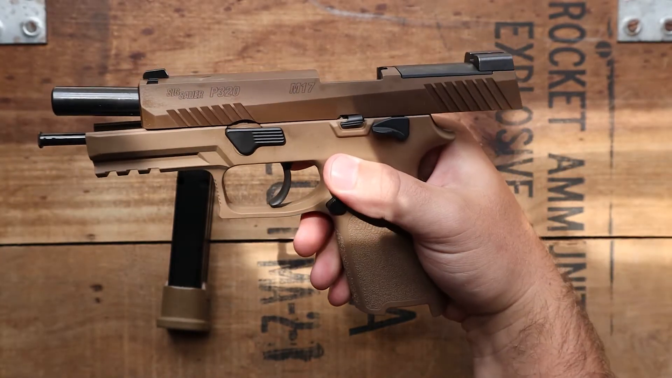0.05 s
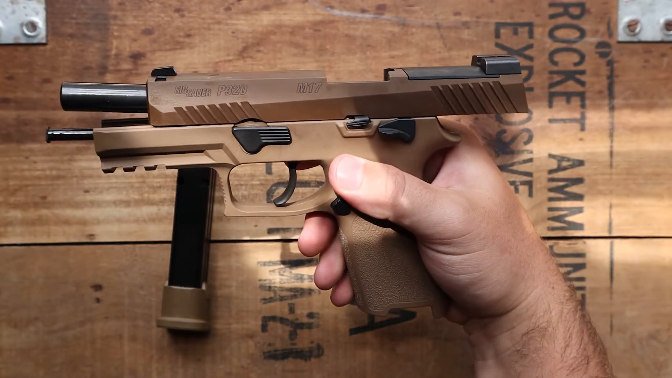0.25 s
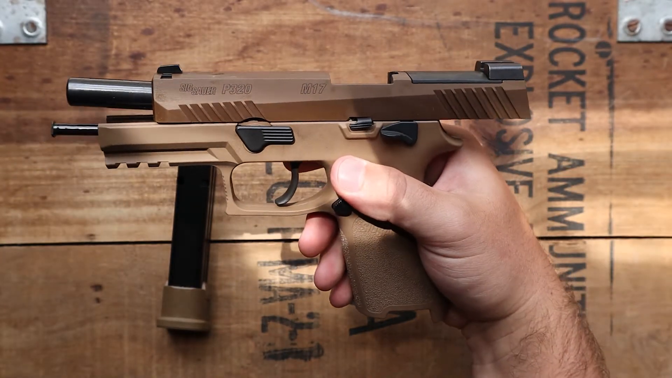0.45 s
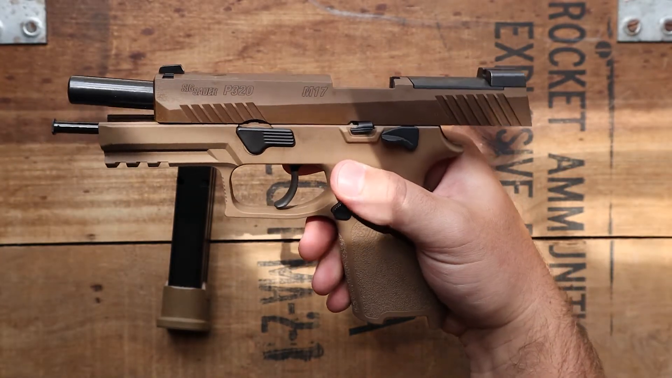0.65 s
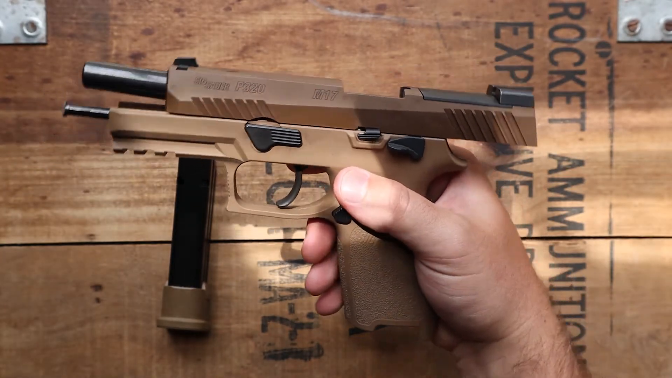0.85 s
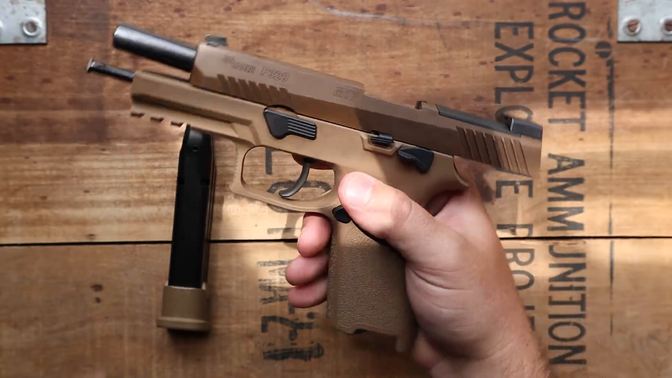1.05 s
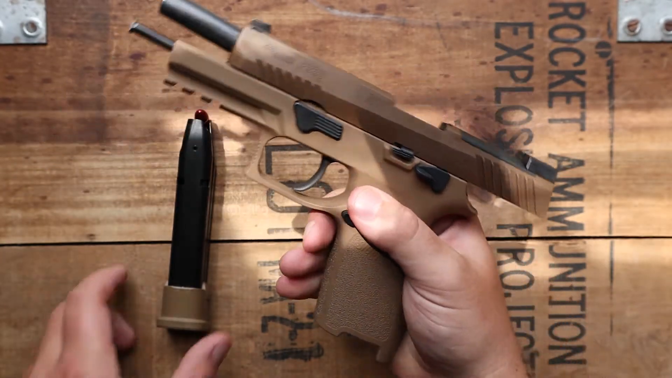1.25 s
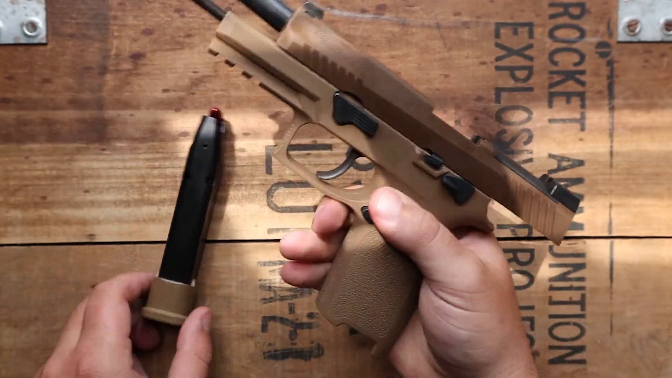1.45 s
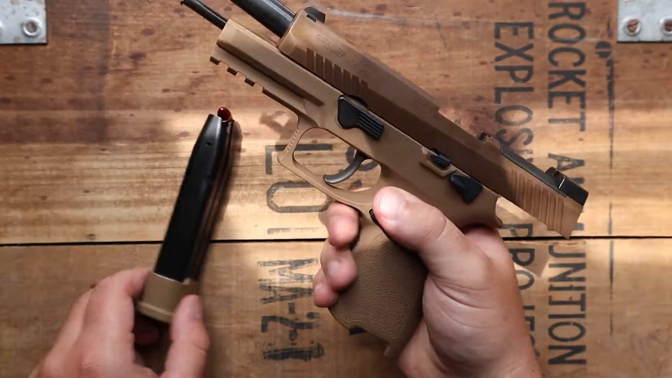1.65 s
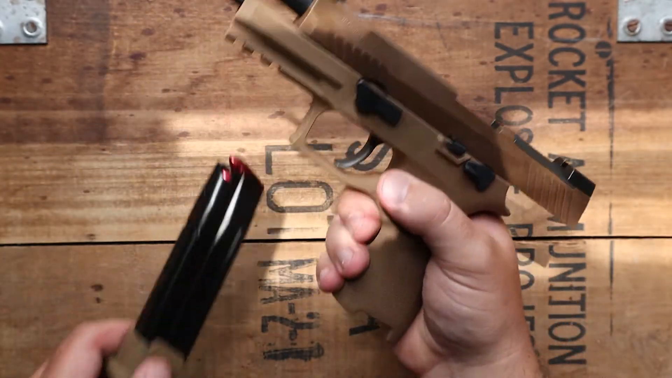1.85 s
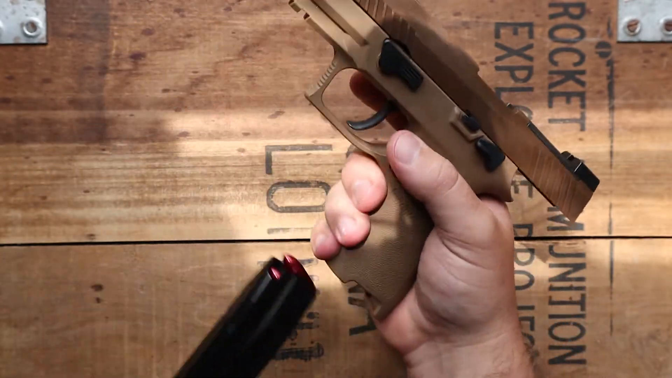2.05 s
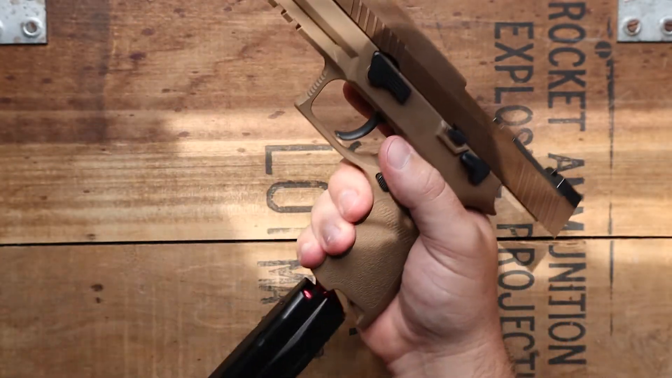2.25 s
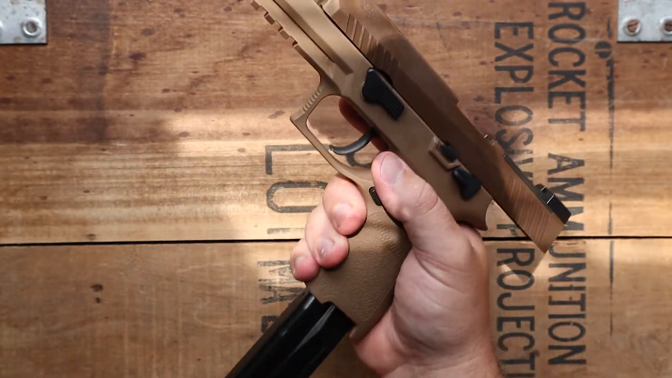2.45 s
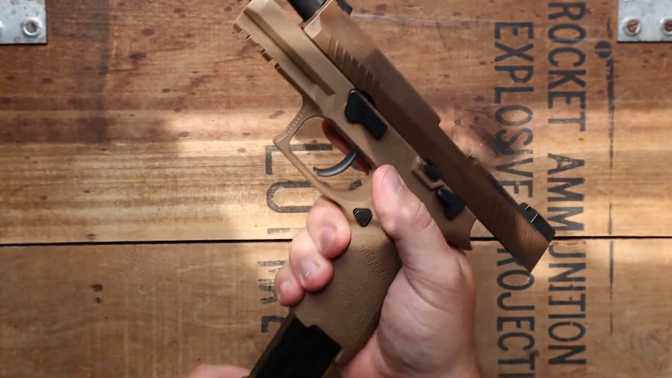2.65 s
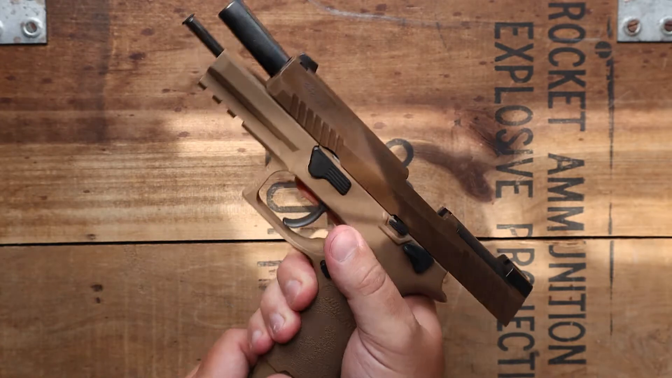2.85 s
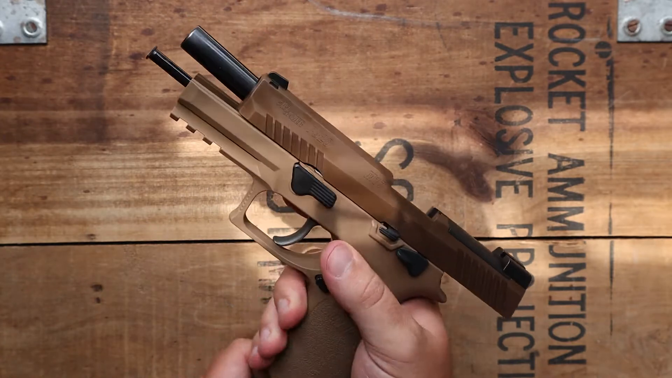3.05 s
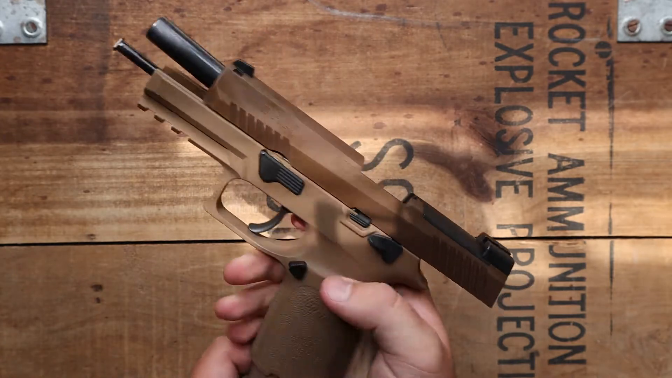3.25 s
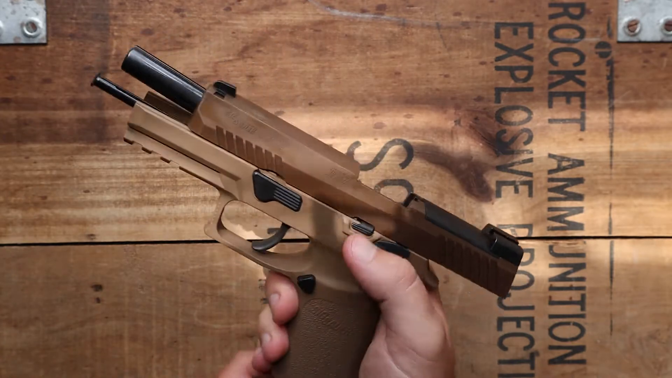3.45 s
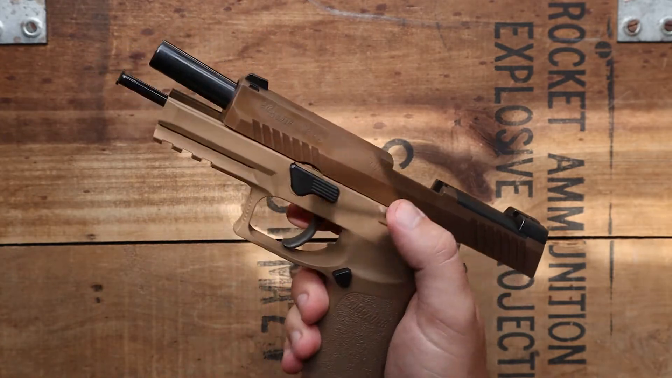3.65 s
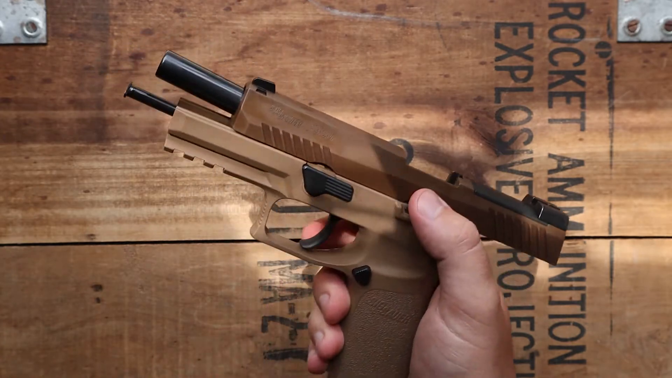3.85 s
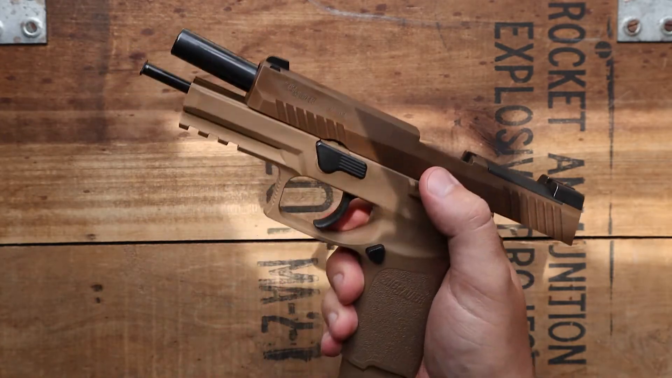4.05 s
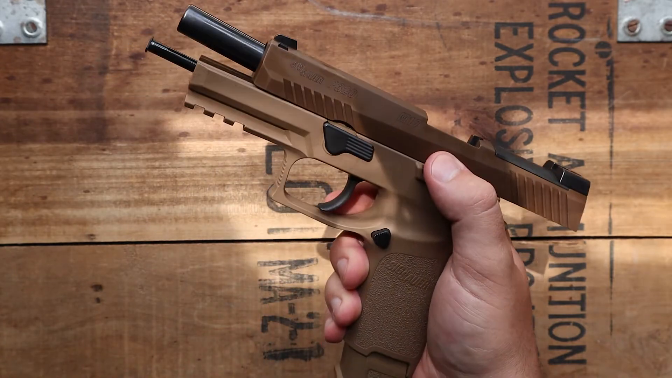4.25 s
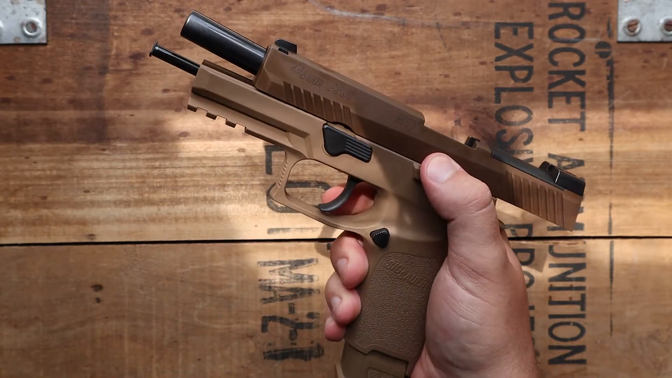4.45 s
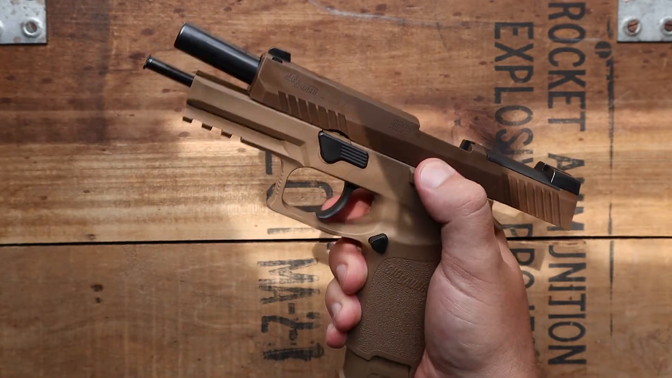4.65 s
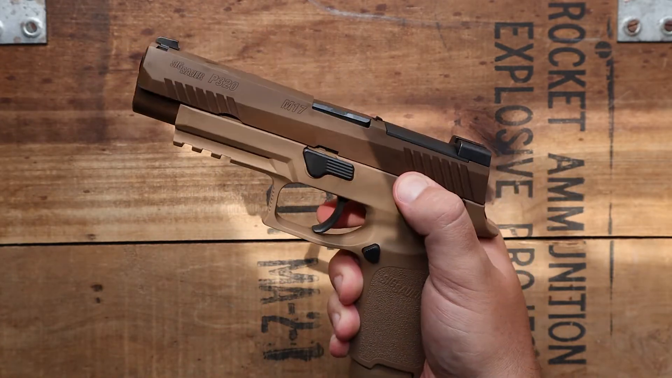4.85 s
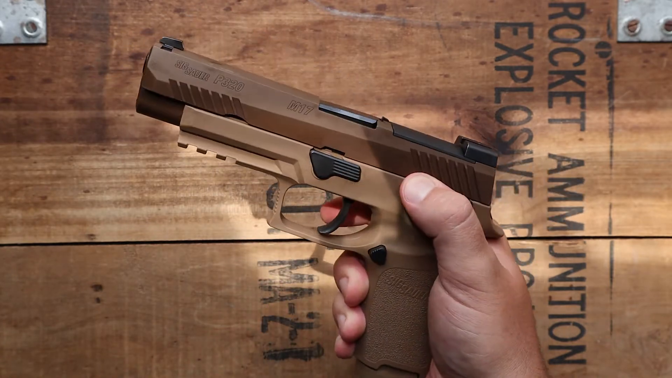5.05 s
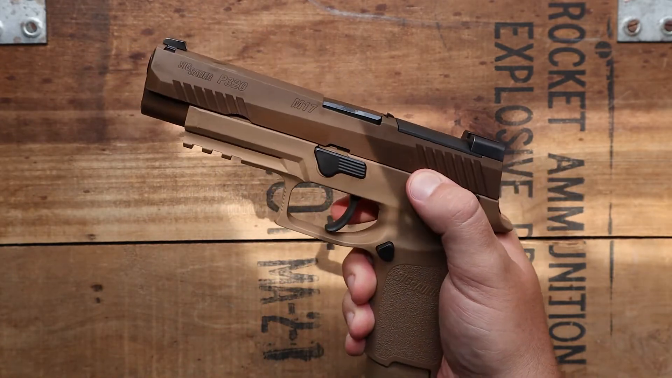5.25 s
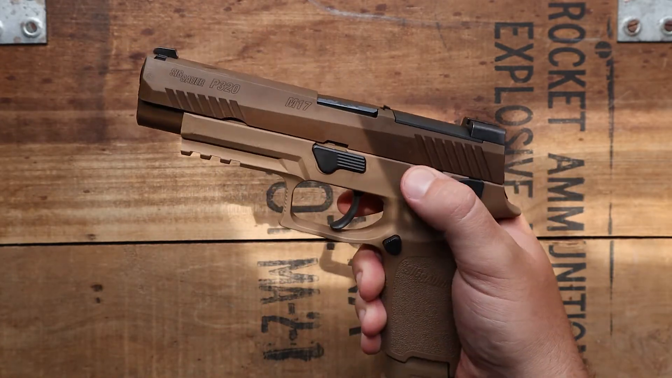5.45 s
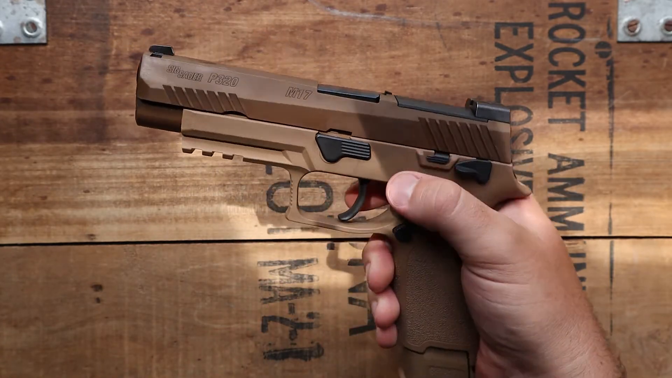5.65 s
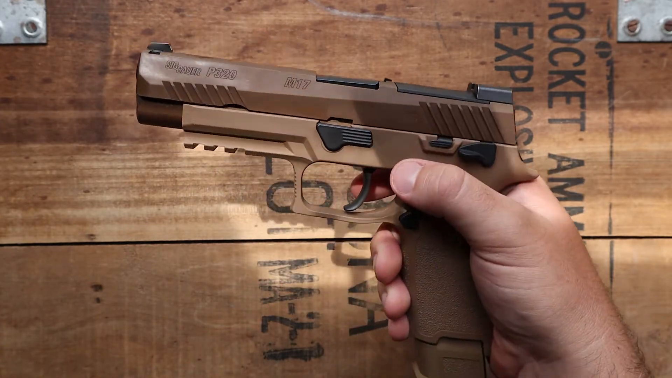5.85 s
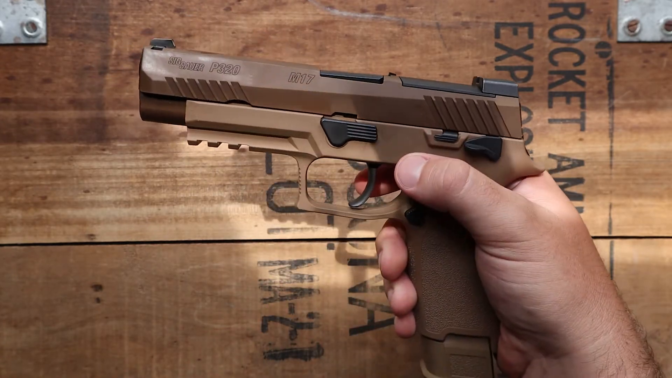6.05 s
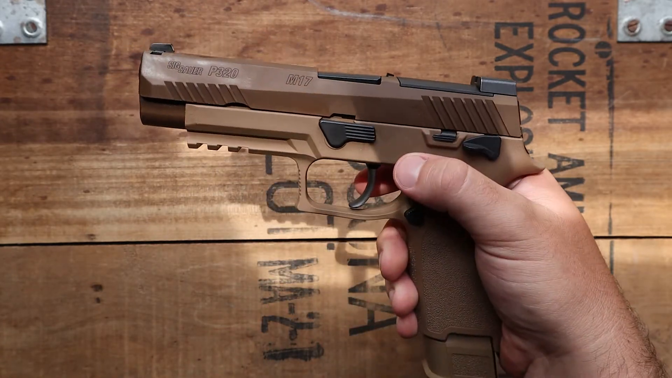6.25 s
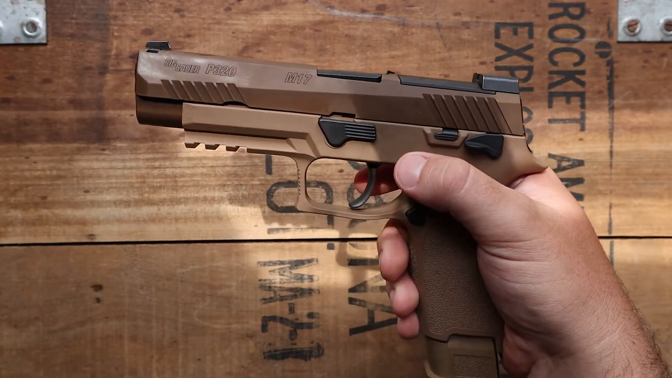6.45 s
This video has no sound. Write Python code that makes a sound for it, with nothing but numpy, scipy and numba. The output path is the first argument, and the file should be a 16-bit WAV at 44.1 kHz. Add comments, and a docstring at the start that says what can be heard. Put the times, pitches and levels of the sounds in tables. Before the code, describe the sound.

Over low steady air noise and a barely audible fan, faint wooden knocks and a short scrape come first. Clicks and a gritty slide quicken into a sharp double metallic smack as a magazine seats, with its rounds shaking briefly. A few tiny ticks, near quiet, a soft click, then a fast bright metal clatter and heavy slam. It is close and dry, with a short bright room tail and fading ring.

```python
"""A pistol is loaded close to the microphone, over a wooden crate in a small room with air noise and a fan.
Skin brushes the grip; a magazine tips and drags on the boards, which answer as damped modes. It clicks and
scrapes up the grip, slips past the catch and is slapped home, and its rounds shake. Loose parts tick, the
thumb loads the catch, and the slide runs forward on its spring and slams shut, leaving a thin steel ring.
Blows are bursts of modes, rubbing is grainy noise, and a limiter squeezes the loudest blows."""
import sys
import numpy as np
from scipy import signal
from scipy.fft import rfft, irfft
from scipy.io import wavfile
from scipy.ndimage import uniform_filter1d, minimum_filter1d
from numba import njit

SR = 44100
rng = np.random.default_rng(int(sys.argv[2]) if len(sys.argv) > 2 else 0)


def store_pcm(level_fs):
    """Save levels as 16-bit WAV."""
    pcm = np.round(np.clip(level_fs, -1, 1) * 32767).astype(np.int16)
    wavfile.write(sys.argv[1], SR, np.atleast_2d(pcm).T)


N = 286723
T = np.arange(N) / SR  # s
AGE = T[:SR // 8]  # time since a blow, s
SPRING_HZ = 4600  # note of the springs among the ringing parts

# The magazine dragged over the boards. Each row: middle in seconds, length in seconds,
# scrape level in dB, judder level at mid-stroke in dB.
DRAGS = [(1.488, .056, -54.5, -64), (1.756, .054, -57.5, -45.5)]
# Colour of the magazine's sliding contact with the grip. Each row: frequency in Hz, level in dB.
FEED_SPECTRUM = [(120, -53), (400, -17.5), (950, 3.5), (1600, -6.5), (3000, 3), (5500, -6), (8000, -7),
                 (10500, -14), (16000, -18.5)]


def undb(db):
    """Decibels are logarithmic: 20 dB is a factor of ten in amplitude."""
    return 10 ** (np.asarray(db) / 20)


def fade(t, t60):
    """Exponential decay: viscous loss takes 60 dB in t60 seconds."""
    return np.exp(-np.log(1000) * t / np.maximum(t60, 1e-4))


def unit(x):
    """Normalization to unit mean power."""
    return x / np.sqrt(np.mean(x ** 2))


def crest(x, size=128):
    """Short-time power: the loudest three milliseconds are scaled to rms 1."""
    return x / np.sqrt(uniform_filter1d(x ** 2, size).max())


def add(out, s, x):
    """Superposition: x is mixed into out from s seconds."""
    i = int(s * SR)
    out[i:i + len(x)] += x[:N - i]


def colour(x, points, size=2048):
    """Minimum-phase filtering through points in (Hz, dB): folding the cepstrum makes the response causal."""
    hz, db = np.transpose(points)
    f = np.maximum(np.fft.rfftfreq(size, 1 / SR), 1)
    gain_db = np.interp(np.log(f), np.log(hz), db)
    cepstrum = irfft(np.log(undb(gain_db)))
    cepstrum[1:size // 2] *= 2
    cepstrum[size // 2 + 1:] = 0
    response = irfft(np.exp(rfft(cepstrum)))
    return signal.fftconvolve(x, response)[:len(x)]


def mode(t, hz, t60):
    """Free vibration: a damped mode is a sine under an exponential decay."""
    return np.sin(2 * np.pi * hz * t) * fade(t, t60)


def stroke(t, middle, length):
    """A movement swells and dies away as a Gaussian, 6 dB down at the ends of its length."""
    return .5 ** ((2 * (t - middle) / length) ** 2)


def rub(level, spectrum, grain_db, patchy_db, size=24):
    """Sliding friction: surface bumps catch and slip in tiny grains, which crowd into uneven patches."""
    grains = np.repeat(grain_db * rng.standard_normal(N // size + 1), size)[:N]
    patch_points = patchy_db * rng.standard_normal(N // size)
    patches = np.interp(np.arange(N) / (10 * size), np.arange(N // size), patch_points)
    noise = undb(grains + patches) * rng.standard_normal(N)
    return level * unit(colour(noise, spectrum))


def background(air_db=-62.5, width_hz=3):
    """Stationary noise: broadband air, and a distant fan's tones that waver as narrow bands of noise do."""
    # Air noise. Each row: frequency in Hz, relative level in dB.
    air_spectrum = [(24, -85.5), (40, -59.5), (167, -35), (392, -12.5), (479, -10), (516, -8), (630, -7),
                    (680, -2.5), (733, -5.5), (810, -4), (1150, -7.5), (2050, -9), (3650, -18),
                    (14800, -26.5), (16000, -18.5)]
    # Tones of the fan. Each row: frequency in Hz, rms level in dB.
    fan_tones = [(522.2, -83.5), (629.8, -83.5), (683.7, -75), (1007, -82.5), (1227, -81), (1443, -80.5)]
    air = undb(air_db) * unit(colour(rng.standard_normal(N), air_spectrum))
    f = np.fft.rfftfreq(N, 1 / SR)
    bands = np.zeros(len(f))
    for hz, db in fan_tones:
        peak = undb(db) * np.sqrt(SR / np.pi / width_hz)  # gives each band its rms level
        bands += peak / (1 + ((f - hz) / width_hz) ** 2)
    fan = irfft(rfft(rng.standard_normal(N)) * bands, N)
    return air + fan


def room(x, level_db=-14, build_s=0.0096, gap_s=0.0021):
    """Reverberation: reflections thicken after a short gap and die away at a rate set by frequency."""
    # Reflections of the room. Each row: frequency in Hz, relative level in dB, t60 in seconds.
    reflections = [(150, -19, .2), (400, -15, 0.095), (800, -5.5, 0.31), (1722, -6, 0.37),
                   (3500, -1.5, 0.36), (7500, 0.5, 0.35), (10500, 1.5, 0.28), (16000, -0.5, 0.27)]
    hz, db, t60 = np.transpose(reflections)
    f, t, cells = signal.stft(rng.standard_normal(SR), SR, nperseg=256)
    decay = fade(t, np.interp(f, hz, t60)[:, None])
    tail = signal.istft(cells * decay)[1][:SR]
    tail = tail * (1 - np.exp(-np.maximum(T[:SR] - gap_s, 0) / build_s))
    tail = colour(tail / np.sqrt(np.sum(tail ** 2)), np.column_stack([hz, db]))
    return undb(level_db) * signal.fftconvolve(x, tail)[:N]


def hand():
    """Light friction: skin brushes the grip in short strokes."""
    # The hand shifting on the grip. Each row: middle in seconds, length in seconds, level in dB.
    brushes = [(0.163, 0.033, -62.5), (0.784, 0.12, -67.5), (1.41, 0.17, -73), (3.273, 0.066, -65),
               (4.09, .055, -65.5), (6.33, 0.076, -69)]
    # Colour of skin on the grip. Each row: frequency in Hz, level in dB.
    skin_spectrum = [(500, -27), (3000, -3.5), (6000, 0), (8500, 1), (10500, -7), (14000, -1),
                     (16000, -5.5)]
    level = sum(undb(db) * stroke(T, s, length) for s, length, db in brushes)
    return rub(level, skin_spectrum, grain_db=1.0, patchy_db=2.0)


def knocks(rows, rattle_db, rattle_t60=0.089):
    """Impact on a modal body: the longer the push, the duller the crate's boards answer."""
    # Modes of the crate. Each row: mean frequency in Hz, level in dB, t60 in seconds.
    crate_modes = [(187, -4.5, 0.19), (256, -1.5, 0.17), (339, 2, 0.052), (454, -1, 0.032), (576, 6, 0.085),
                   (790, -3, 0.087), (1220, -20, .04), (1740, -10, .03)]
    # Colour of the rattle. Each row: frequency in Hz, level in dB.
    rattle_spectrum = [(150, -5), (300, 6), (700, 3.5), (1300, -9), (3300, -17.5), (8000, -27.5),
                       (16000, -37)]
    out = np.zeros(N)
    for s, db, contact_s in rows:
        boards = np.zeros(len(AGE))
        for hz, mode_db, t60 in crate_modes:
            detune = 1 + 0.023 * rng.standard_normal()
            boards += undb(mode_db) * mode(AGE, hz * detune, t60)
        push = signal.fftconvolve(boards, np.exp(-AGE / contact_s))[:len(AGE)]
        rattle = colour(rng.standard_normal(len(AGE)) * fade(AGE, rattle_t60), rattle_spectrum)
        knock = crest(push) + undb(rattle_db) * crest(rattle)
        knock = colour(knock, [(80, -53), (130, -24), (210, 17)])  # cuts the bass
        add(out, s, undb(db) * crest(knock))
    return out


def judder(rate_hz=74, contact_s=0.00077, jitter_s=0.00102):
    """Intermittent contact: the dragged base skips over the wood grain in small, unevenly paced knocks."""
    rows = []
    for middle, length, _, db in DRAGS:
        for s in np.arange(middle - length / 2, middle + length / 2, 1 / rate_hz):
            start = s + jitter_s * rng.standard_normal()
            knock_db = db + 20 * np.log10(stroke(s, middle, length))
            rows.append((start, knock_db, contact_s))
    return rows


def pickup():
    """Impact and friction together: the magazine tips, scrapes and judders on the crate."""
    # The magazine tipping on the boards. Each row: start in seconds, level in dB, contact time in seconds.
    tips = [(1.5184, -46, .0002), (1.5560, -42, 0.00092), (1.563, -43.5, 0.0018)]
    # Colour of the scrape on wood. Each row: frequency in Hz, level in dB.
    scrape_spectrum = [(120, -37), (220, 8), (600, 2), (1200, 2.5), (3300, -5), (6000, -9.5), (9000, -12.5),
                       (16000, -27)]
    level = sum(undb(db) * stroke(T, s, length) for s, length, db, _ in DRAGS)
    tipping = knocks(tips, rattle_db=-12.5)
    skipping = knocks(judder(), rattle_db=0.0)
    return tipping + skipping + rub(level, scrape_spectrum, grain_db=1.5, patchy_db=2.5)


def magazine(seated_s=2.848, rise_s=.008, hold_s=.055, shake_t60=.12, shake_db=-36.5):
    """Friction up the grip, then damped motion: the seated rounds shake on their spring and settle."""
    # Scrape of the magazine as it is pushed up the grip. Each row: time in seconds, level in dB.
    feed_levels = [(2.54, -62.5), (2.664, -48.5), (2.704, -50), (2.84, -47.5)]
    s, db = np.transpose(feed_levels)
    push = undb(np.interp(T, s, db, left=-140, right=-140))
    age = np.maximum(T - seated_s, 0)
    shake = undb(shake_db) * (1 - np.exp(-age / rise_s)) * fade(np.maximum(age - hold_s, 0), shake_t60)
    scrape = rub(push, FEED_SPECTRUM, grain_db=2.5, patchy_db=3.0)
    return scrape + rub(shake, FEED_SPECTRUM, grain_db=3, patchy_db=4.0)


def slide(release_s=4.758, travel_s=0.034, clatter_t60=.085, level_db=-3):
    """Spring-driven motion: friction grows with speed over a quarter swing, then dies away as clatter."""
    # Colour of the running slide. Each row: frequency in Hz, level in dB.
    run_spectrum = [(60, -49.5), (200, -43), (340, -17), (600, -10), (1150, -9.5), (1650, 2), (2200, -2),
                    (4300, -2), (8500, 0), (10000, -5.5), (13000, -1.5), (16000, -10)]
    age = np.maximum(T - release_s, 0)
    speed = np.sin(np.pi / 2 * np.minimum(age / travel_s, 1))
    level = undb(level_db) * speed * fade(np.maximum(age - travel_s, 0), clatter_t60)
    return rub(level, run_spectrum, grain_db=2.14, patchy_db=0.5)


def rings(rise_s=.002):
    """Lightly damped resonance: magazine, barrel and springs sing on after a jolt."""
    # Parts left ringing. Each row: start in seconds, frequency in Hz, level in dB, t60 in seconds.
    ringing_parts = [(4.794, 1766, -45, 2.35), (4.794, 770, -58, 1.7), (2.998, SPRING_HZ, -30, .024),
                     (4.678, SPRING_HZ, -46, .06), (3.110, SPRING_HZ, -57, .14),
                     (3.147, SPRING_HZ, -55.5, .09), (1.478, 3250, -64, .2)]
    out = np.zeros(N)
    for s, hz, db, t60 in ringing_parts:
        add(out, s, undb(db) * mode(T, hz, t60) * (1 - np.exp(-T / rise_s)))
    return out


def crack(envelope, count=2):
    """High modal density: a burst of so many modes that its spectrum is nearly even."""
    x = rng.standard_normal(len(envelope)) * envelope
    for _ in range(count):
        spectrum = rfft(x)
        flat = irfft(spectrum / np.abs(spectrum), len(x))
        x = flat * np.sqrt(envelope)
    return crest(x)


def slips(count=7, start_s=2.7818, gap_s=.0073, gap_ratio=.915):
    """Stick-slip against the magazine catch: each slip comes sooner, harder and brighter than the last."""
    rows, s = [], start_s
    for k in range(count):
        note_hz = 1420 * np.exp(.1 * rng.standard_normal())
        level_db, treble_db = -29 + 1.88 * k, -23.5 + 2.7 * k
        rows.append((s, level_db, note_hz, -1.5, -7, treble_db))  # columns as in the table of blows
        s += gap_s * gap_ratio ** k
    return rows


def strikes(frame_db=-9.5, bass_hz=600, body_hz=2300, treble_hz=8000, treble_lift_db=5, rise_s=.0006):
    """Impact of steel on steel in a fist: a dense crack, the frame's modes and the struck part's own note."""
    # Colour of the contact. Each row: frequency in Hz, level in dB.
    steel_spectrum = [(60, -23), (150, -26), (300, -15), (600, 5), (1200, 3), (2500, 2.5), (5000, 2),
                      (8500, -0.5), (10000, -4.5), (13000, -3), (16000, -5.5)]
    # Resonances of frame and magazine. Each row: frequency in Hz, width in Hz before the hand's damping,
    # level in dB.
    frame_modes = [(1820, 84, -0.5), (2527, 73, 2), (3386, 54, 3.5), (4680, 46, -1.5), (5660, 120, -10),
                   (6270, 18, -5), (7760, 37, -9.5), (8580, 110, -8), (12900, 75, -13.5), (12000, 70, -4.5)]
    # Blows on the frame: the magazine finds the well, rides up, passes the catch, is slapped home and
    # settles; loose parts tick; the thumb loads the slide catch; the slide lets go, strips a round and locks.
    # Each row: start in seconds, level in dB before the bass cut, note in Hz, note level in dB,
    # bass in dB, treble in dB before the treble lift.
    blows = [ (2.4813, -28.5, 1950, -0.5, 8, -11), (2.4845, -33, 945, -3.5, -6, -21),
             (2.5243, -33, 1720, -10, -8.5, -27), (2.5767, -33.5, 1005, 6.5, 2, -39),
             (2.6144, -42, 980, 1, 4, -16), (2.646, -31.5, 1103, -3, -7, -18),
             (2.8085, -16.5, 2160, -4, -20, -1), (2.8427, -21.5, 2600, -1, -9, -3),
             (2.8463, -5, 10600, -14, -8, -0.5), (2.8484, -4.5, 1933, -8.5, -3, -8.5),
             (2.928, -24.5, 1870, 4, -21, -6), (2.9975, -29, 3200, -6, -18.5, -19),
             (3.0368, -33.5, 1500, -0.5, -5.5, -26), (3.110, -54, 6000, 2.5, -11.5, -5),
             (3.1467, -54.5, 9000, -6, -11.5, -5), (3.5156, -43.5, 2480, -7.5, -13.5, -5),
             (3.517, -38, 2430, -2, -13, -11.5), (3.5381, -42.5, 5840, -4.5, -4.5, -10),
             (3.5441, -37.5, 2896, -3, -4.5, -10), (3.5653, -52, 4510, -10, -6, -13),
             (3.5742, -41.5, 1238, -1.5, -5.5, -20.5), (4.6597, -38.5, 1910, -6, -12.5, -13.5),
             (4.676, -51.5, 7000, -9, -10.5, -7.5), (4.758, -15.5, 2420, -11, -11, -1.5),
             (4.7604, -4.5, 3380, -5, -6.5, -8.5), (4.7650, -1, 8000, 0, -13.5, -13.5),
             (4.7774, -1.5, 3740, -5, -4, 9), (4.7941, 1, 1708, 5, -8.5, -13.5)]
    out = np.zeros(N)
    contact = 1 - np.exp(-AGE / rise_s)  # the faces take a moment to bear fully
    for s, db, note_hz, note_db, low_db, high_db in blows + slips():
        t60 = .025 * 2 ** (db / 80.5)  # harder blows ring longer, doubling every 80.5 dB
        # every point of contact drives the resonances differently; the hand damps them within milliseconds
        frame = np.zeros(len(AGE))
        for hz, width, mode_db in frame_modes:
            sign = rng.choice([-1, 1])
            frame += undb(mode_db) * sign * mode(AGE, hz, 1 / (width / 2 + .5 / t60))
        burst = crack(fade(AGE, 1.5 * t60) * contact)
        body = colour(burst + undb(frame_db) * crest(frame * contact), steel_spectrum)
        bright_db = high_db + treble_lift_db
        top_db = bright_db + min(high_db, 0)  # a soft contact keeps falling off towards the top
        tilt = [(bass_hz, low_db), (body_hz, 0), (treble_hz, bright_db), (3.0 * treble_hz, top_db)]
        note = crest(mode(AGE, note_hz, t60) * contact)
        hit = crest(colour(body, tilt)) + undb(note_db) * note
        add(out, s, undb(db) * crest(hit))
    # the deep bass of the blows is cut
    return colour(out, [(50, -26.0), (170, -20.5), (340, -1)])


def scene():
    """Superposition of sources: each group sounds from its own place and so has its own reflections."""
    sources = [pickup() + hand(), strikes(), magazine() + slide()]
    in_room = sum(x + room(x) for x in sources)
    return (in_room + rings() + background())[None]


@njit
def follow(x, attack, release):
    """Envelope detection: a one-pole average with separate rates for rising and falling."""
    out, e = np.empty(len(x)), 0.
    for i in range(len(x)):
        e += (x[i] - e) * (attack if x[i] > e else release)
        out[i] = e
    return out


def record(dry, knee_db=-8.0, attack_s=0.0003, release_s=0.0048, ceiling=1.0, top_hz=16000):
    """Dynamic range limiting: gain falls under the blows, what slips past is rounded, rumble and top are cut."""
    lowpass = signal.ellip(10, .2, 80, top_hz, fs=SR, output="sos")
    x = signal.sosfilt(lowpass, dry[0])
    envelope = follow(np.abs(x), min(1 / (attack_s * SR), 1), 1 / (release_s * SR))
    gain = np.minimum(1, undb(knee_db) / (envelope + 1e-9))
    gain = uniform_filter1d(minimum_filter1d(gain, size=24), size=24)  # it looks a little ahead
    rounded = ceiling * np.tanh(x * gain / ceiling)
    rounded = colour(rounded, [(60, -17), (130, -9), (220, 0.5)])
    return signal.sosfilt(lowpass, rounded)[None]


dry = scene()
out = record(dry)
store_pcm(out)
```